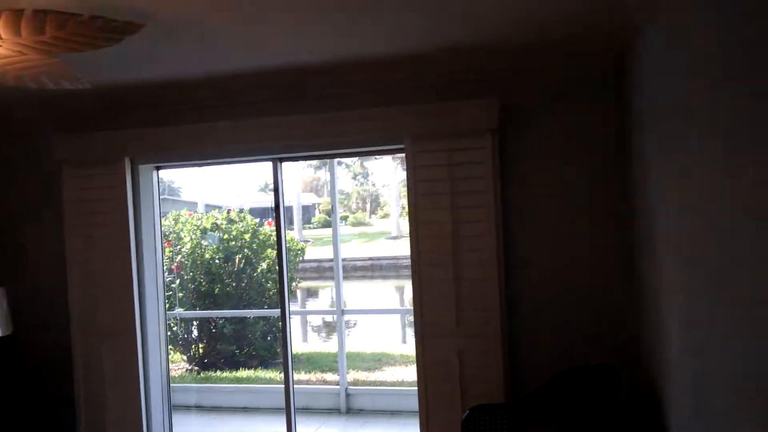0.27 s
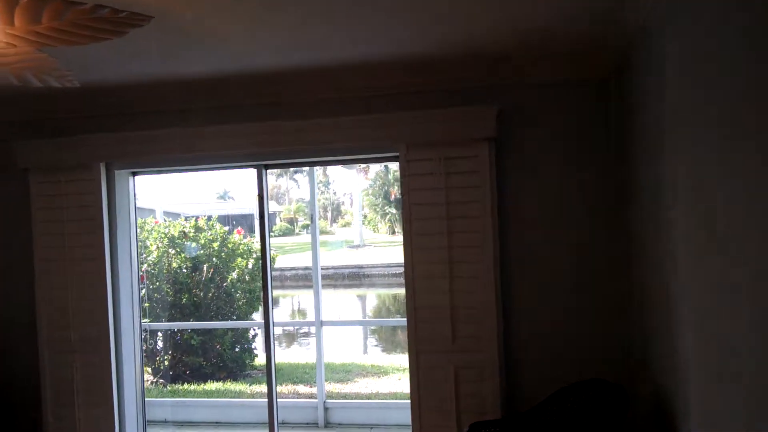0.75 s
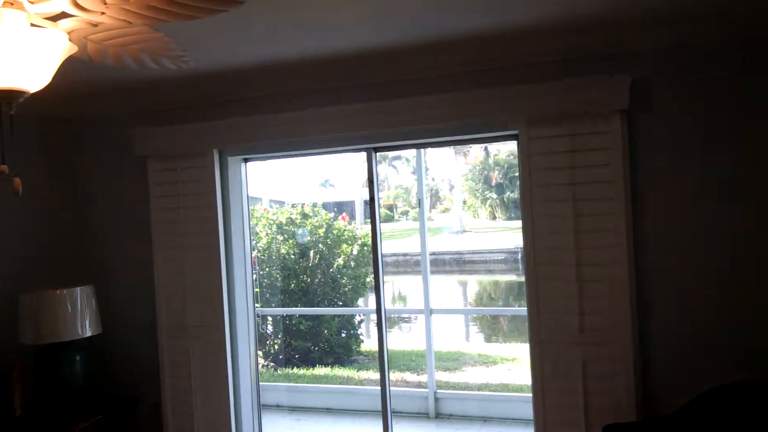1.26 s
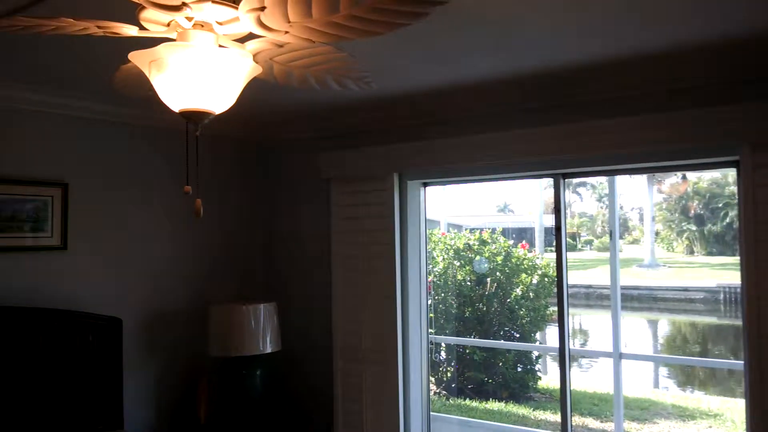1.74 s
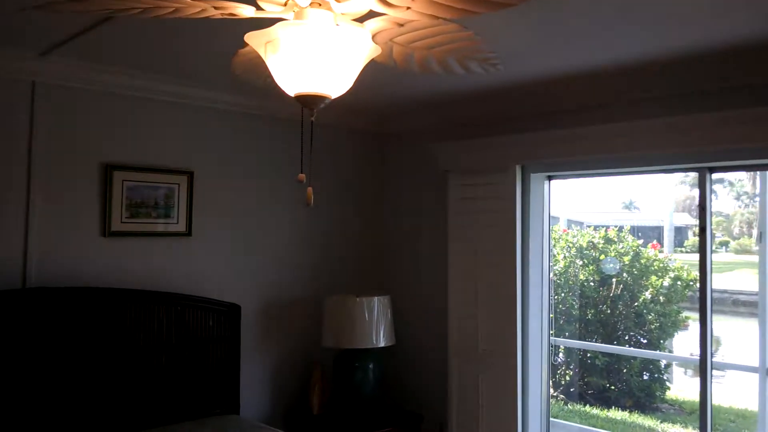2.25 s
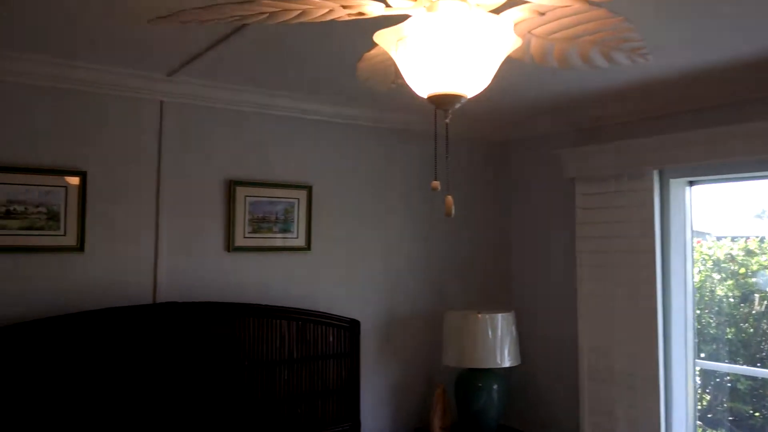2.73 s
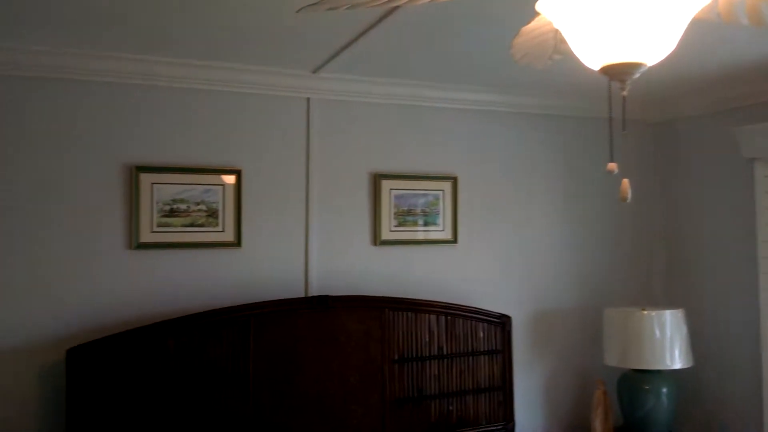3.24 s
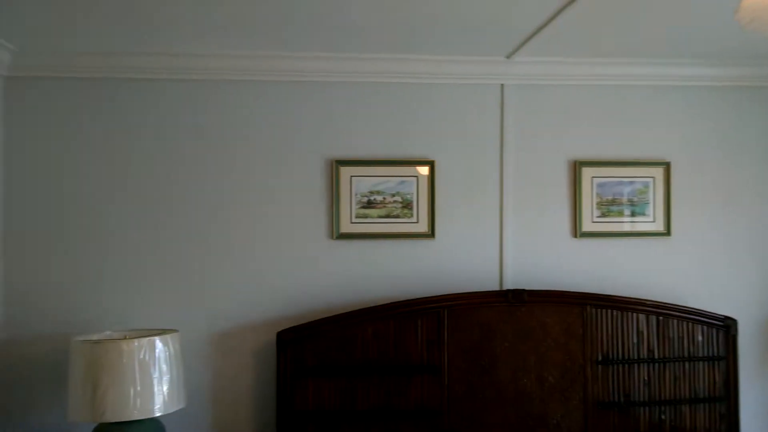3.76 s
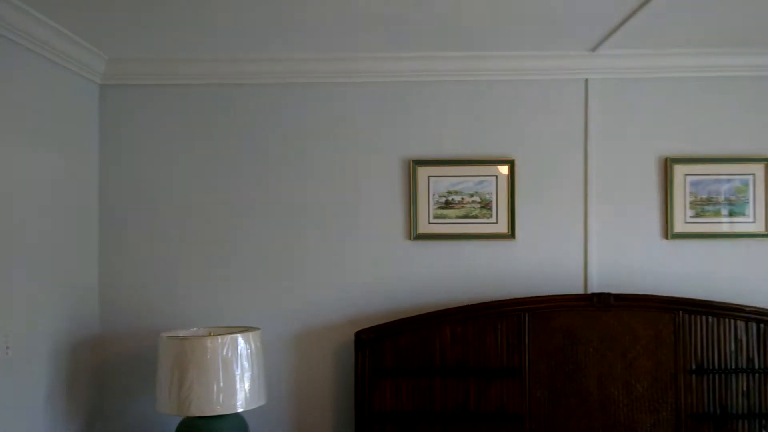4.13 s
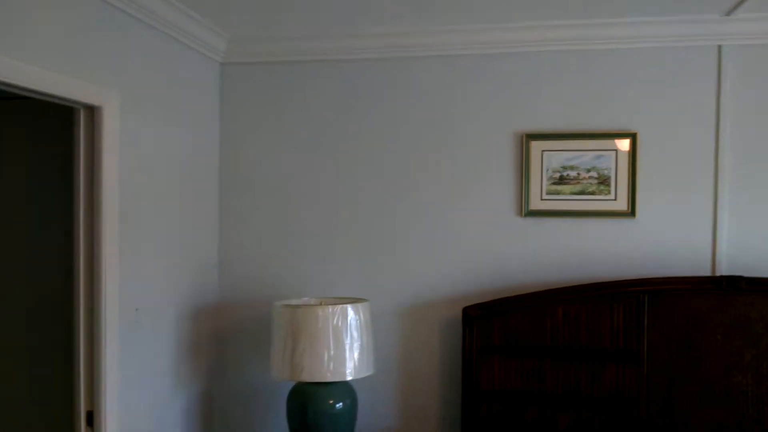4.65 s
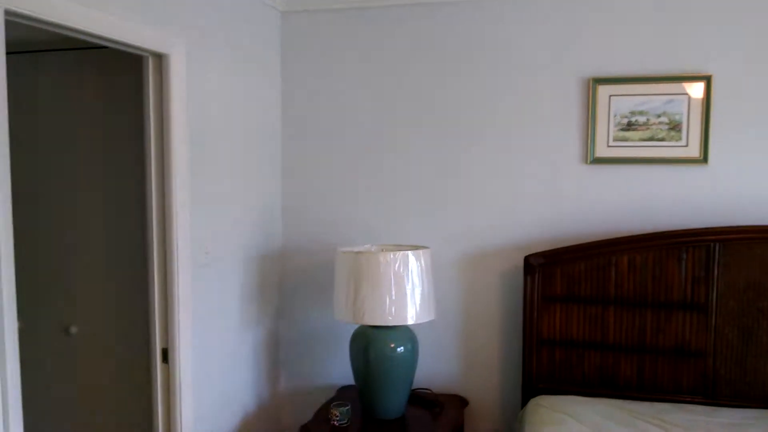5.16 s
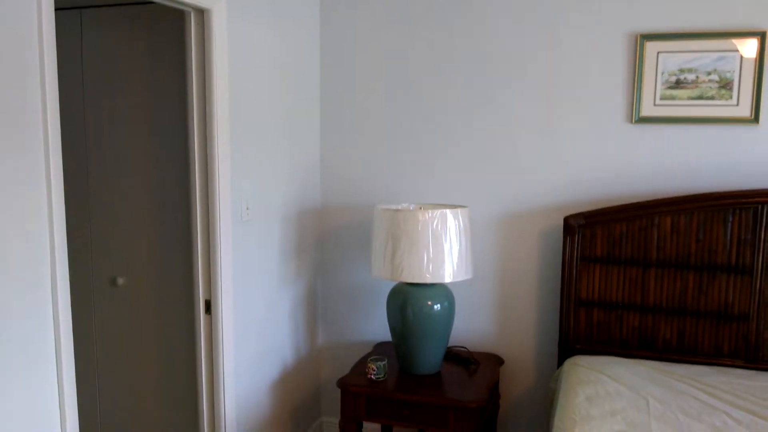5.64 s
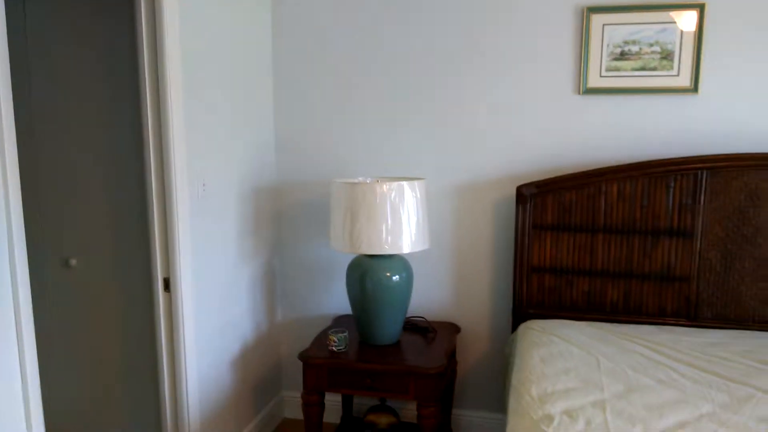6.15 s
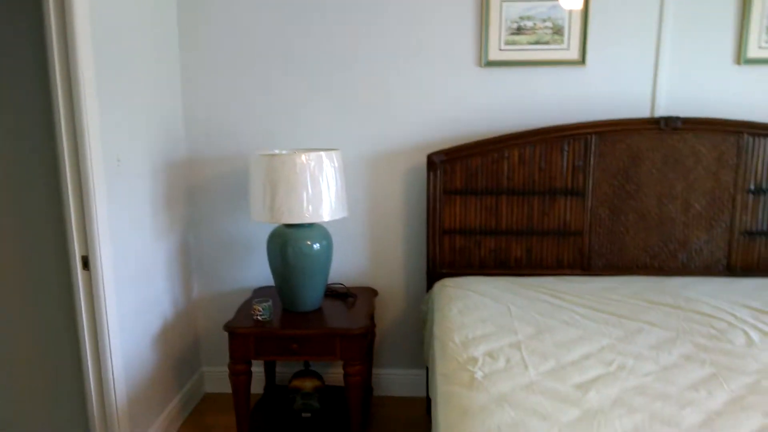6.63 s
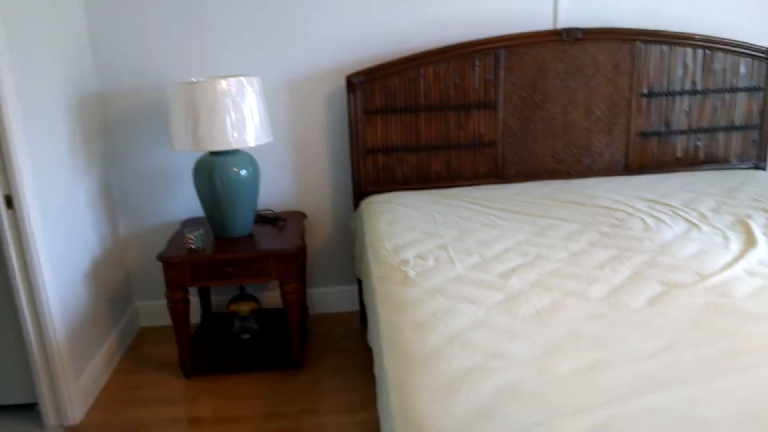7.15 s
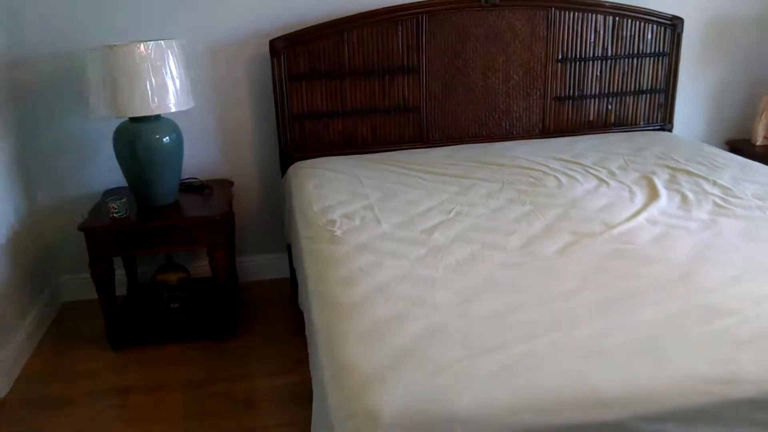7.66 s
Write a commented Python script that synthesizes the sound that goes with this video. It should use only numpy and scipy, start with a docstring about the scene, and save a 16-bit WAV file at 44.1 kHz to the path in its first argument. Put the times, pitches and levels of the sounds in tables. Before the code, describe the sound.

A quiet bedroom with a faint, steady fan hum, low rumble and thin microphone hiss throughout, wavering slightly in level. At 0.2 s a firm, dull heel knock lands on the wooden floor with a mid-pitched clack, followed by softer ones around 0.4 and 0.6 s. At 1.2 s a finger pushes the camera case with a low double bump, and light knocks follow. Around 1.5 to 1.6 s more steps lead into a sharp, bright burst of case ticks and a short cloth swish. Weaker knocks come at 2.1 and 2.3 s; a thump, rustles and ticks cluster at 2.4 to 2.7 s. Near 3.1 s soles slide with a hollow rasp, then soft steps at 3.5 s and small ticks at 3.7 and 4.6 to 4.9 s. Calm hum follows until 6 s, when faint swishes, a light scrape at 6.4 s and dull steps return, fading by 7.3 s. Close, wide stereo with short room reflections.

```python
"""Throughout, a fan hums faintly in a quiet bedroom over room rumble and microphone hiss, as a hand-held camera turns.
Soft steps load the wooden floor from the start: boards swing, heels clack. At 1.2 s a finger pushes the case.
Then filtered-noise cloth swishes and bright case ticks come in, and around 3.1 s soles slide with a hollow rasp.
After a calm stretch, fainter steps and swishes return from 6 s. Cross-feed between the close ports widens it all."""
import sys
import numpy as np
from scipy import signal
from scipy.fft import rfft, irfft
from scipy.io import wavfile

SR = 44100
rng = np.random.default_rng(int(sys.argv[2]) if len(sys.argv) > 2 else 0)


def unload_wav(signal):
    """Save mono or channel-first audio to the path in sys.argv[1] as 16-bit WAV at rate SR, clipped to [-1, 1]."""
    wavfile.write(
        sys.argv[1],
        SR,
        np.round(np.clip(np.atleast_2d(signal).T, -1, 1) * 32767).astype(np.int16),
    )


N = 348108

# Resonance widths below lie between the -6 dB points. Event levels are set before room and cross-feed.

# Fan-driven air at the reference level, common to both ports and opposed in them.
# Each row: frequency in Hz, density in dB per Hz.
AIR_COMMON = [(20, -93), (55, -86.5), (100, -92.5), (150, -94), (260, -91), (450, -91), (620, -96.5),
              (1000, -105), (2000, -113), (5000, -130)]
AIR_OPPOSED = [(20, -78), (60, -89.5), (120, -85), (250, -96), (450, -89.5), (700, -101), (1300, -109),
               (4000, -128)]
# Microphone hiss at its reference level. Each row: frequency in Hz, density in dB per Hz.
HISS_SPECTRUM = [(200, -114), (2000, -110), (4000, -109.5), (8000, -108.5), (11000, -107), (15000, -104)]
# Room resonances kept ringing by the fan. Each row: pitch in Hz, width in Hz, rms in dB at the air reference.
ROOM_DRONES = [(57.7, 6.2, -71.5), (193.5, 5.9, -72), (217, 7.3, -75), (248.5, 8.7, -70.5), (290, 33, -78),
               (347.6, 16, -71.5)]
# Motor tones that go with the hum. Each row: pitch in Hz, pitch wander in Hz, level in dB against the hum.
MOTOR_TONES = [(85, 0.46, -7), (103.5, 0.5, -11), (302, 1.67, -1.5)]
# Background fader moves, read against the references below. Each row: time in seconds, air in dB, hiss in dB.
BACKGROUND_LEVELS = [(0.0, -60, -60.5), (1.93, -62, -61), (2.17, -61.5, -60), (2.48, -61.5, -59.5),
                     (4.77, -66.5, -65), (6.22, -66.5, -65), (6.77, -62.5, -61.5), (7.47, -66, -65),
                     (7.89, -66.5, -65.5)]
# Fan whine as the camera moves through the room. Each row: time in seconds, level in dB before the whine gain.
WHINE_LEVELS = [(0.0, -63.5), (0.37, -62.5), (0.94, -68), (1.47, -66.5), (2.06, -71.5), (2.68, -75),
                (2.86, -72.5), (3.47, -64), (4.44, -70), (5.14, -62.5), (6.02, -70.5), (6.5, -66),
                (7.89, -68)]
# Main hum tone as the camera turns. Each row: time in seconds, rms in dB.
HUM_LEVELS = [(0, -64), (1.9, -61), (2.3, -69.5), (3.3, -70.5), (4.4, -80), (7.9, -71.5)]
# Cloth swishes. Each row: time of the top in seconds, rms in dB before the swell's room part and the grain,
# seconds to swell or fade by a factor e.
CLOTH_SWISHES = [(1.568, -34, 0.003), (1.590, -38, 0.0089), (2.46, -49, 0.062), (2.666, -45, 0.045),
                 (3.03, -51, 0.14), (3.745, -51.5, 0.05), (4.675, -54.5, 0.015), (6.0, -59, 0.084),
                 (6.6, -58, 0.071), (7.07, -59, 0.025)]
# Cloth colour, only its shape counts. Each row: frequency in Hz, relative level in dB.
CLOTH_COLOUR = [(150, 11.5), (1000, 8.5), (2000, 1.5), (3500, 5), (7000, 1.5), (11000, -3.5), (15000, 0)]
# Sliding soles. Each row: time of the top in seconds, rms in dB before the swell's room part and the grain,
# seconds to swell or fade by a factor e, resonance in Hz, its width in Hz.
SOLE_SLIDES = [(0.12, -65.5, 0.36, 1660, 1100), (2.445, -56.5, 0.013, 1380, 950),
               (3.03, -53, 0.047, 650, 350), (3.09, -58, 0.02, 885, 160), (3.08, -56, 0.061, 1380, 1200),
               (3.12, -51.5, 0.044, 580, 400), (3.137, -53, 0.02, 1215, 120),
               (3.162, -54, 0.012, 1050, 110), (6.45, -56, 0.03, 880, 650)]
# Board resonances under a sliding sole. Each row: pitch in Hz, level in dB over the plain rasp.
SLIDE_BOARD_MODES = [(670, -1), (880, 3), (1080, 0), (1235, -7)]
# Ticks of the camera case. Each row: start in seconds, direct peak in dB, ringing pitch in Hz.
CASE_TICKS = [(1.568, -30, 6700), (1.5835, -28, 3420), (1.5883, -27, 5950), (1.5913, -20.5, 9800),
              (1.5923, -20.5, 14000), (2.648, -36, 11600), (2.6627, -41, 3700), (2.672, -33, 9500),
              (2.7262, -36, 6500), (3.7085, -38.5, 6400), (3.7345, -38, 6170), (4.6053, -43, 6500),
              (4.665, -46.5, 3500), (4.668, -43, 8300), (4.9327, -44, 6300), (6.2718, -42, 1510)]
# Tick colour before tilt and ringing. Each row: frequency in Hz, relative level in dB.
TICK_COLOUR = [(150, -13), (700, 2), (2000, -2), (5000, 8.0), (15000, 4.0), (19000, -19.0)]
# Finger pushes on the case. Each row: start in seconds, nominal level in dB before the balance and the leak.
FINGER_BUMPS = [(1.1728, -5.7), (1.1827, -12.2)]
# Mid-pitched clacks of heel and boards, each with a room tail.
# Each row: start in seconds, direct peak in dB, pitch in Hz.
BOARD_SNAPS = [(0.2175, -34.5, 620), (0.406, -40.5, 750), (0.4335, -40, 570), (1.513, -44.5, 1350),
               (1.538, -38.5, 1700), (2.354, -44.5, 780), (3.5707, -49, 1250), (6.273, -50.5, 1090),
               (6.4002, -49, 1380)]
# Steps on the floor. Each row: start in seconds, peak of the board swing in dB before the balance,
# board pitch in Hz, its width in Hz, scuff in dB against the board before the scuff trade in knocks(),
# room in dB against the board.
FLOOR_KNOCKS = [(0.199, -12, 271, 141, -20, -5), (0.3872, -26, 350, 330, -8, -4),
                (0.411, -35, 303, 90, -17, -9), (0.562, -44.5, 340, 300, -4.5, 7),
                (0.608, -40.5, 454, 450, -4, 7.5), (1.2611, -29, 386, 383, -22, 3),
                (1.2645, -27.5, 251, 239, -12, -4), (1.514, -25.5, 434, 563, -6, 4),
                (1.517, -27, 267, 139, -20, -5), (1.5411, -26, 280, 115, -15, -1),
                (2.061, -35, 466, 440, -2, 0.5), (2.33, -41, 503, 400, -5, 8),
                (2.5884, -24, 390, 260, -10, 1), (3.4679, -30.5, 358, 190, -12.5, -0.5),
                (3.483, -31.5, 260, 132, -13, -5.5), (3.571, -37.5, 283, 212, -7.5, 5.5),
                (6.3999, -28.5, 360, 179, -11, 3), (6.789, -36.5, 324, 232, -16, 2.5),
                (7.226, -41, 344, 330, -8, 3.5)]
# Sole-scuff colour, only its shape counts. Each row: frequency in Hz, relative level in dB.
SCUFF_COLOUR = [(100, 15), (400, 10), (620, 10.5), (830, 10), (1100, -0.5), (1300, -9), (1650, -7.5),
                (2600, -17), (6000, -34), (15000, -59)]
# Floor ringing after a step. Each row: pitch in Hz before a small detune, relative level in dB, t60 in seconds.
FLOOR_RING_MODES = [(200, -3.5, .36), (256.4, -1, .3), (299.5, -1.5, 0.29), (390, -5.5, 0.42),
                    (574, 4, 0.34), (790, 5, 0.43)]
# Cross-feed between the ports. Each row: frequency in Hz, share taken from the other channel.
PORT_CROSSFEED = [(350, 0.04), (1200, 0.75), (2100, 0.9), (2450, 1), (2900, 1), (4000, 0.53), (5200, 0.52),
                  (8000, 0.14), (15000, .35)]

AIR_REF_DB, HISS_REF_DB = -67, -69  # fader levels at which the spectra above hold
# Harder ticks and faster rubs are brighter: level with untilted treble in dB, then dB per octave gained per dB
TICK_FLAT_DB, TICK_BRIGHTENING = -35, 0.36
CLOTH_FLAT_DB, CLOTH_BRIGHTENING = -58, 0.4
TICK_RING_DB, TICK_RING_WIDTH = 0, 0.44  # resonance level; its width as a share of the pitch
SLIDE_MODE_WIDTH_HZ = 58
RUB_ROOM_DB, RUB_T60_S = -1.5, 0.46  # the room's answer to any rubbing
STEP_PAN_DB = -1.3  # left minus right
FLOOR_RING_DB = -11  # energy of the ringing against the board swing
CROSS_LAG_S = 1 / 2560
TOP_HZ = 15600

T = np.arange(N) / SR  # seconds
FREQS = np.maximum(np.arange(N // 2 + 1) * SR / N, 1)  # Hz, whole length
CLICK_HZ = np.maximum(np.arange(1025) * SR / 2048, 1)  # Hz, short clicks
MIRROR = np.array([[1], [-1]])  # left plus, right minus


def undb(db):
    """Turn decibels into gain."""
    return 10 ** (np.asarray(db) / 20)


def unit(x):
    """Scale to rms 1, taken over all channels."""
    return x / np.sqrt(np.mean(x ** 2))


def along(points, hz=FREQS):
    """Read a (Hz, value) curve on a log-frequency axis."""
    f, value = np.transpose(points)
    return np.interp(np.log(hz), np.log(f), value)


def over_time(rows):
    """Draw every column of a table of fader moves as straight lines over time."""
    s, *columns = np.transpose(rows)
    return [np.interp(T, s, column) for column in columns]


def noise(db, channels=1):
    """Shape independent white noises to a density in dB per Hz."""
    white = rng.standard_normal((channels, N))
    return irfft(rfft(white) * undb(db) * np.sqrt(SR / 2), N)


def resonance(hz, width, freqs=FREQS):
    """Give a steep-sided resonance curve in dB, 0 dB at its pitch."""
    return -20 * np.log10(1 + ((freqs - hz ** 2 / freqs) / width) ** 2)


def walk(rate):
    """Low-passed noise wanders at random below about this rate in Hz, rms 1."""
    return unit(noise(-20 * np.log10(1 + (FREQS / rate) ** 4))[0])


def ports(pair, side_db):
    """Build left and right from a common part and an opposed part."""
    return pair[0] + undb(side_db) * MIRROR * pair[1]


def add(out, s, sound):
    """Mix a sound in at s seconds."""
    i = int(s * SR)
    out[:, i:i + sound.shape[-1]] += sound[..., :N - i]


def click(gain):
    """Pack the gains at CLICK_HZ into a minimum-phase click: energy as early as possible, peak 1."""
    # folding the cepstrum onto positive times makes the click causal
    cepstrum = irfft(np.log(gain))
    cepstrum[1:len(gain) - 1] *= 2
    cepstrum[len(gain):] = 0
    y = irfft(np.exp(rfft(cepstrum)))
    return y / np.abs(y).max()


def in_room(sound, room_db, t60, gap_s=0.0046, side_db=-7, early_db=3, early_s=0.017):
    """Walls answer the direct sound with dense early reflections that thin into a short tail."""
    t = T[:SR // 2]
    early = 1 + undb(early_db) * np.exp(-t / early_s)
    onset = np.clip(t / gap_s - 1, 0, 1)
    decay = undb(-60 * t / t60) * early * onset
    # flat-spectrum blocks with random phase: all pitches return equally, at random times
    blocks = irfft(np.exp(2j * np.pi * rng.random((2, 22, 513))))
    scatter = blocks.reshape(2, -1)[:, :len(t)]
    wet = signal.fftconvolve(ports(scatter, side_db) * decay, sound[None], axes=1)
    wet *= undb(room_db) * np.sqrt(2 * np.sum(sound ** 2) / np.sum(wet ** 2))
    wet[:, :len(sound)] += sound
    return wet


def tone(hz, wander_hz, waver_db):
    """A motor sings a sine whose pitch and strength wander a little, rms 1."""
    phase = 2 * np.pi * np.cumsum(hz + wander_hz * walk(6.93)) / SR
    return unit(np.sin(phase) * undb(waver_db * walk(14.0)))


def room_air():
    """Moving air makes low rumble and keeps the room resonances ringing."""
    air = ports([noise(along(AIR_COMMON))[0], noise(along(AIR_OPPOSED))[0]], side_db=-1)
    for hz, width, db in ROOM_DRONES:
        drone = ports(noise(resonance(hz, width), channels=2), side_db=0.0)
        air += undb(db) * unit(drone)
    return air


def fan_whine(whine_hz=427.3, whirr_db=-12):
    """Blades sing a tone; the walls smear it into a narrow whirr that differs at the two ports."""
    whirr = unit(ports(noise(resonance(whine_hz, width=30), channels=2), side_db=7.0))
    blade = tone(whine_hz, wander_hz=0.86, waver_db=0.8)
    return unit(blade + undb(whirr_db) * whirr)


def motor_hum(hum_hz=119.0):
    """A wavering hum tone carries fainter motor tones around it."""
    hum = tone(hum_hz, wander_hz=0.49, waver_db=3.5)
    for hz, wander_hz, db in MOTOR_TONES:
        hum += undb(db) * tone(hz, wander_hz, waver_db=0.5)
    return hum


def background(whine_gain_db=4):
    """Air, fan whine, motor hum and microphone hiss change in level as the camera turns."""
    air_db, hiss_db = over_time(BACKGROUND_LEVELS)
    whine_db, = over_time(WHINE_LEVELS)
    hum_db, = over_time(HUM_LEVELS)
    out = room_air() * undb(air_db - AIR_REF_DB)
    out += fan_whine() * undb(whine_db + whine_gain_db)
    out += motor_hum() * undb(hum_db)
    out += noise(along(HISS_SPECTRUM), channels=2) * undb(hiss_db - HISS_REF_DB)
    return out


def swell(s, length):
    """A rub builds to its top and fades as fast; the room holds on to its energy."""
    power = np.exp(-2 * np.minimum(np.abs(T - s) / length, 20))
    keep = undb(-120 / (RUB_T60_S * SR))  # share of power kept per sample
    held = signal.lfilter([1 - keep], [1, -keep], power)
    return np.sqrt(power + undb(RUB_ROOM_DB) ** 2 * held)


def swishes(grain_db=1.76):
    """Cloth fibres catch and slip, heard as grainy noise that brightens with level."""
    out = np.zeros((2, N))
    grain = undb(grain_db * walk(250))
    octaves = np.log2(np.maximum(FREQS, 1000) / 1000)
    for s, db, length in CLOTH_SWISHES:
        tilt_db = CLOTH_BRIGHTENING * (db - CLOTH_FLAT_DB)
        cloth = unit(noise(along(CLOTH_COLOUR) + tilt_db * octaves, channels=2))
        out += undb(db) * swell(s, length) * grain * cloth
    return out


def slides(grain_db=0.5, slips_per_s=130):
    """Soles drag over the boards, whose resonances colour the hollow rasp."""
    out = np.zeros((2, N))
    slips = unit(undb(grain_db * walk(slips_per_s)))
    modes = sum(undb(db + resonance(hz, SLIDE_MODE_WIDTH_HZ)) for hz, db in SLIDE_BOARD_MODES)
    boards_db = 20 * np.log10(1 + modes)
    for s, db, length, hz, width in SOLE_SLIDES:
        rasp = noise(resonance(hz, width) + boards_db, channels=2)
        sole = unit(ports(rasp, side_db=-4.5))
        out += undb(db) * swell(s, length) * slips * sole
    return out


def ticks():
    """The case ticks close to the ports: bright clicks, each with a few milliseconds of crackle."""
    out = np.zeros((2, N))
    colour = along(TICK_COLOUR, CLICK_HZ)
    octaves = np.log2(np.maximum(CLICK_HZ, 500) / 1000)
    for s, db, hz in CASE_TICKS:
        tilt_db = TICK_BRIGHTENING * (db - TICK_FLAT_DB)
        ring = 1 + undb(TICK_RING_DB + resonance(hz, TICK_RING_WIDTH * hz, CLICK_HZ))
        tick = click(ring * undb(colour + tilt_db * octaves))
        crackle = in_room(tick, room_db=10, t60=0.36, gap_s=0.00018, side_db=1.0,
                          early_db=12.5, early_s=0.0016)
        add(out, s, undb(db) * crackle)
    return out


def bumps(push_s=0.0022, hardness=12.5, creep=0.2, creep_s=0.0042, leak_hz=19,
          pan_db=-2.8, lag_s=0.00038, snap_db=-40, snap_hz=2100, snap_width_hz=2000):
    """The case is pushed against one port and away from the other, snaps faintly; the pressure leaks back."""
    out = np.zeros((2, N))
    t = np.maximum(T[:SR // 15] - np.array([[lag_s], [0]]), 0)  # left lags
    # a quick strike, then the slower give of the fingertip
    strike = (t / push_s * np.exp(1 - t / push_s)) ** hardness
    give = (t / creep_s * np.exp(1 - t / creep_s)) ** hardness
    snap = click(undb(resonance(snap_hz, snap_width_hz, CLICK_HZ)))
    for s, db in FINGER_BUMPS:
        balanced_db = db + MIRROR * pan_db / 2
        add(out, s, (strike + creep * give) * MIRROR * undb(balanced_db))
        add(out, s + push_s, snap * undb(db + snap_db))
    leak = signal.butter(1, leak_hz, "high", fs=SR, output="sos")
    return signal.sosfilt(leak, out)


def wood(hz, width):
    """A struck board swings for a few cycles; soft contact leaves nothing far above its pitch."""
    softness = (1 + (CLICK_HZ / (1.64 * hz)) ** 8) ** .5
    return -click(undb(resonance(hz, width, CLICK_HZ)) / softness)


def snaps(width_share=0.63):
    """Boards and heels clack as the weight comes onto them, each clack with a room tail."""
    out = np.zeros((2, N))
    for s, db, hz in BOARD_SNAPS:
        clack = in_room(wood(hz, width_share * hz), room_db=-1.0, t60=0.75, gap_s=0.0028)
        add(out, s, undb(db) * clack)
    return out


def floor_ring(board):
    """One board's swing sets the floor ringing in decaying sines, slightly detuned at each step."""
    t = T[:SR // 2]
    ring = np.zeros(len(t))
    for hz, db, t60 in FLOOR_RING_MODES:
        detune, phase = rng.standard_normal(2)
        pitch = hz * (1 + 0.0086 * detune)
        ring += undb(db - 60 * t / t60) * np.sin(2 * np.pi * (pitch * t + phase))
    ring = signal.fftconvolve(ring * (1 - np.exp(-t / 0.014)), board)
    return ring * undb(FLOOR_RING_DB) * np.sqrt(np.sum(board ** 2) / np.sum(ring ** 2))


def knocks(t60=0.48, room_gap_s=0.0066, early_db=1, scuff_room_db=10):
    """A heel loads a board, which swings for a few cycles; the sole adds a dull, scattered scuff."""
    out = np.zeros((2, N))
    contact = unit(click(undb(along(SCUFF_COLOUR, CLICK_HZ))))
    for s, db, hz, width, contact_db, room_db in FLOOR_KNOCKS:
        board = wood(hz, width)
        # the scuff trades direct level for room
        scuff = contact * board.std() * undb(contact_db - scuff_room_db)
        step = in_room(board, room_db, t60, gap_s=room_gap_s, early_db=early_db)
        step += floor_ring(board)
        step += in_room(scuff, room_db + scuff_room_db, t60, gap_s=0.00018, early_db=-14)
        add(out, s, step * undb(db + MIRROR * STEP_PAN_DB / 2))
    return out


def scene():
    """Sum everything that reaches the two ports."""
    return background() + swishes() + slides() + ticks() + bumps() + snaps() + knocks()


def record(dry):
    """Each channel subtracts the delayed other port, which widens the image; the top is cut."""
    spectrum = rfft(dry)
    share = np.clip(along(PORT_CROSSFEED), 0, 1)
    cross = share * np.exp(-2j * np.pi * FREQS * CROSS_LAG_S)
    wide = irfft(spectrum - cross * spectrum[::-1], N)
    top_cut = signal.ellip(10, .2, 70, TOP_HZ, fs=SR, output="sos")
    return signal.sosfilt(top_cut, wide)


dry = scene()
out = record(dry)
unload_wav(out)
```